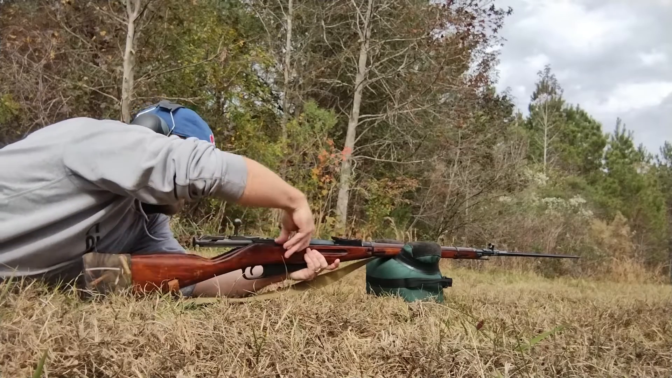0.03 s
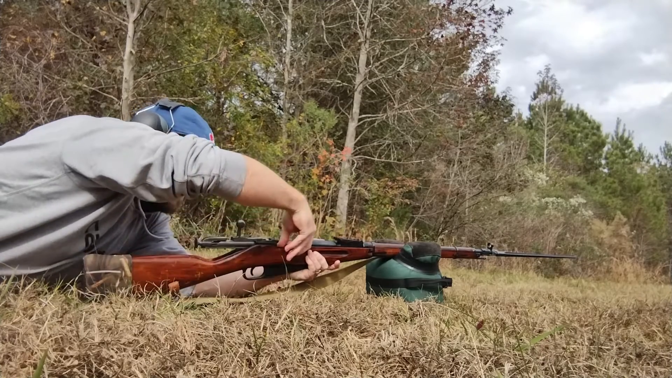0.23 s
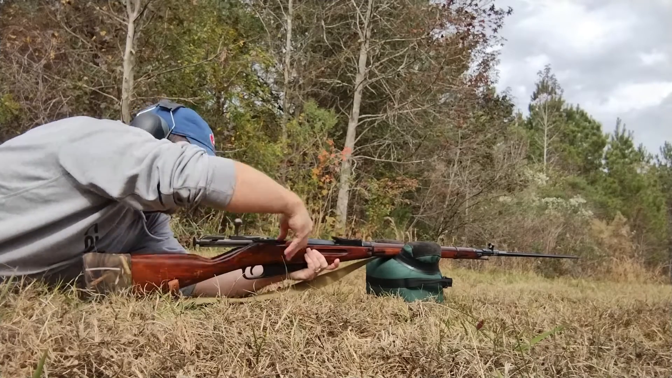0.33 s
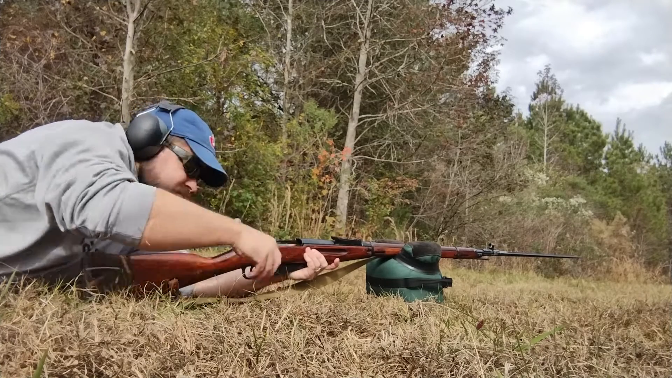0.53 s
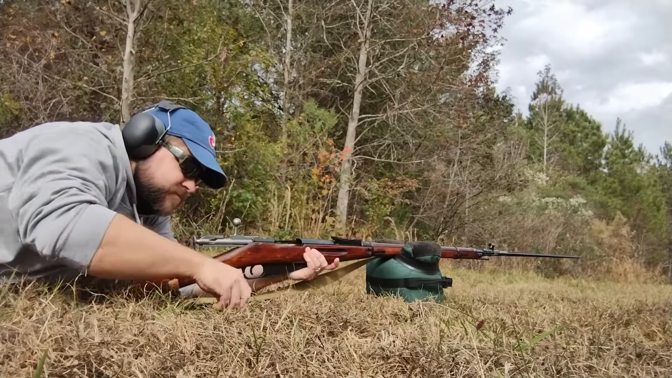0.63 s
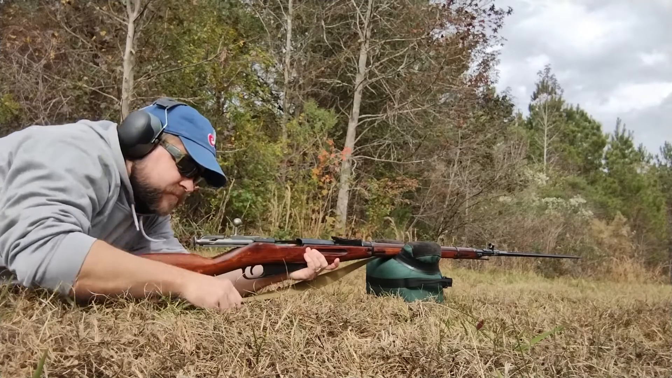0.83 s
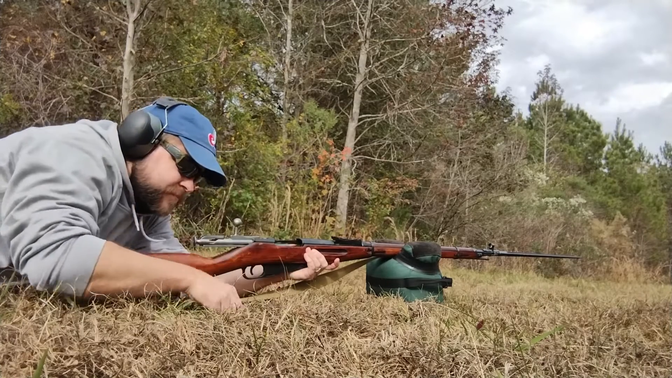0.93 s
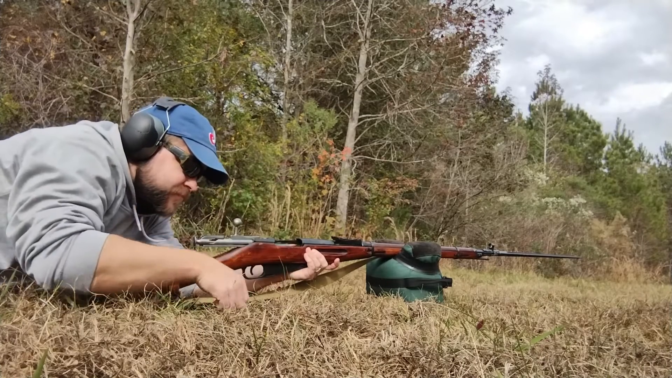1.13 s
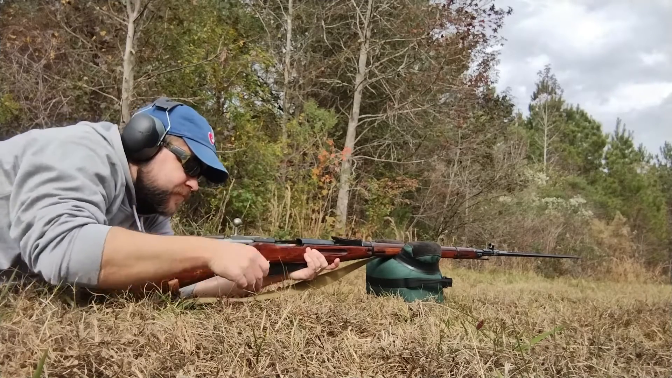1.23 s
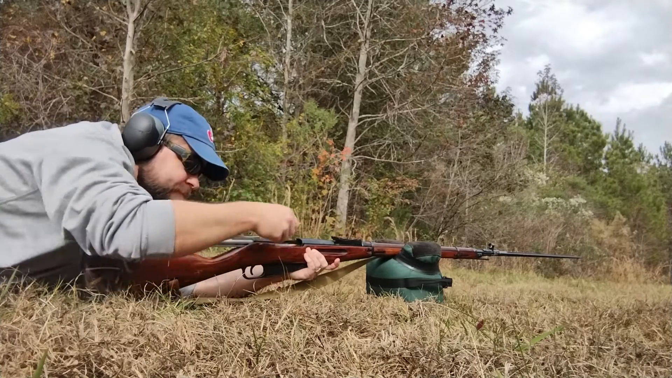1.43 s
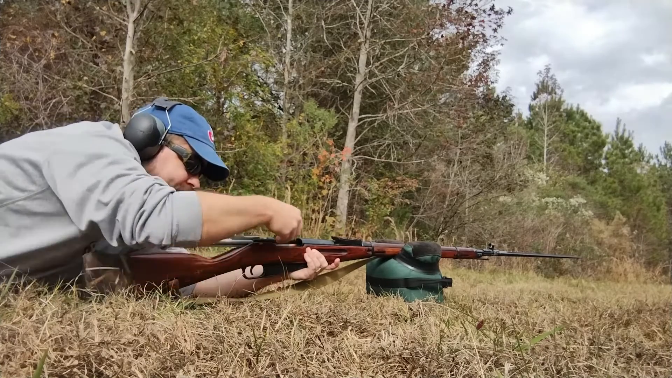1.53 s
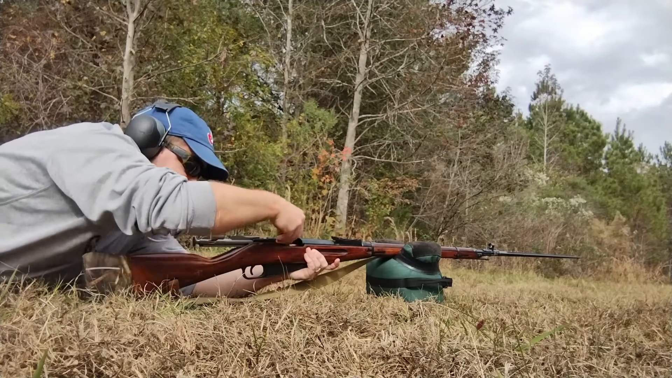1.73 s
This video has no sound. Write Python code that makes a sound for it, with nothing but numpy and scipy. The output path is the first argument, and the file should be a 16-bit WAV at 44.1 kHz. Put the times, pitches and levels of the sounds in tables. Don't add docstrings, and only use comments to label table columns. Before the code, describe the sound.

Close stereo sound of a steel rifle bolt in a wooden stock, rattling, clacking hard twice and settling within half a second; afterwards only low open-air rumble, soft hiss, faint engine drone and thin insect ticks.

```python
import sys
import numpy as np
from scipy import signal
from scipy.fft import rfft, irfft, next_fast_len
from scipy.io import wavfile
from scipy.ndimage import map_coordinates

SR = 44100
rng = np.random.default_rng(int(sys.argv[2]) if len(sys.argv) > 2 else 0)


def materialize(psi):
    bounded = np.clip(np.atleast_2d(psi).T, -1, 1)
    quanta = np.round(bounded * 32767).astype(np.int16)
    wavfile.write(sys.argv[1], SR, quanta)


def voltage_ratio(decibels):
    exponent = np.asarray(decibels, float) / 20
    return 10 ** exponent


N = 77175
HALVES = np.array([[.5], [-.5]])


def unit(x):
    return x / np.sqrt(np.mean(x ** 2) + 1e-20)


def along(points, hz):
    f, v = np.transpose(points)
    return np.interp(np.log(hz + 1), np.log(f + 1), v)


def wobble(rate):
    knots = rng.standard_normal(int(N * rate / SR) + 4)
    return map_coordinates(knots, [np.arange(N) * rate / SR])


def filtered(x, response):
    m = next_fast_len(N + SR // 2)
    return irfft(rfft(x, m) * response(np.fft.rfftfreq(m, 1 / SR)), m)[..., :N]


def resonances(table):
    def response(f):
        total = 0
        for k, (centre, width, db) in enumerate(table):
            mode = 1j * f * width / (centre ** 2 - f ** 2 + 1j * f * width)
            total = total + (-1) ** k * voltage_ratio(db) * mode
        return total
    return response


# (time [s], level [dB], edge brightness [dB], length [s], pitch [Hz])
SLIDE_CONTACTS = [
    (0.0404, -36.5, 3.5, .0024, 4550),
    (.0722, -33, 10, .0012, 3803),
    (0.0725, -32, -9.5, 0.002, 3751),
    (.0748, -29.5, -5, 0.0034, 3950),
    (0.0807, -40, -10.5, 0.0063, 3800),
    (.0842, -36, 0.5, .003, 4946),
    (.0882, -30.5, 5.5, .0012, 4700),
    (.0915, -32.5, -7, .0025, 4200),
    (.0955, -40.5, -3, .004, 3820),
    (.102, -54, -6.5, .007, 3521),
]
CLACK_CONTACTS = [(0.191, -46, -1.5, .004, 4600), (0.1994, -26.5, -5, .004, 4200),
                  (.2045, -14, 7, .0016, 4000), (.2060, -8, 0, .0026, 4000), (.2075, -9, -9, .002, 3300),
                  (.2092, -10, -5, .0022, 4500), (0.2123, -22.5, -3.5, 0.0046, 3900),
                  (.2194, -23.5, 7, .0025, 4000), (.2211, -11, -3, .0024, 4400),
                  (.2233, -15, -1, .0017, 3600), (0.2261, -23.5, -3, .0052, 3900),
                  (.2322, -24.5, 0, .005, 3800), (.2388, -36, -8, .01, 3800)]
SETTLE_CONTACTS = [
    (.3707, -52, -1.5, 0.0012, 3170),
    (.3781, -54.5, -18.5, .003, 3930),
    (.3909, -33, -4, .0022, 4200),
    (.3934, -41, -12, .003, 3600),
    (.3969, -37, -8, .002, 4400),
    (.3993, -32, -8, .0028, 4600),
    (.4030, -48, -14, .004, 3300),
    (.4112, -55.5, -6, 0.003784, 4900),
    (1.5496, -69.5, -1.5, 0.00208, 3500),
]
TOUCH_CONTACTS = [
    (1.7405, -72, -15, 0.0029192, 2400),
    (1.7445, -72.5, -15, 0.002214, 2400),
]
KNOCK_DB = [-4.5, -4, 2, 22]
KNOCK_T60 = [.08, 0.071, 0.05691, 0.057454]
GROUND_DB = [-20, -16.5, -25, -25.5]
# treble corner of the edge [Hz], light contacts carry less
DULL_CORNER_HZ = [10953, 20014, 10453, 7001.3]


def bolt():
    contacts = [SLIDE_CONTACTS, CLACK_CONTACTS, SETTLE_CONTACTS, TOUCH_CONTACTS]
    x = sum(movement(*each) for each in zip(contacts, KNOCK_DB, KNOCK_T60, GROUND_DB, DULL_CORNER_HZ))
    low_hz, gap_hz, gap_width_hz, gap_depth = 347.93, 1855.6, 710, .7
    dip = resonances([(gap_hz, gap_width_hz, 0)])
    return filtered(x, lambda hz: (1j * hz / (low_hz + 1j * hz)) ** 3 * (1 - gap_depth * dip(hz)))


# (frequency [Hz], left minus right [dB])
BOLT_LEVEL_SIDE = [(500, -1), (1500, -1), (3000, .6), (6000, 2), (10000, 5.5), (14000, 11)]
# (frequency [Hz], lead of the left [rad])
BOLT_PHASE_SIDE = [(100, -.4), (700, -.7), (1500, -.8), (3000, -1.05), (6000, -1.4), (14000, -1.55)]


def placed_bolt():
    def sides(hz):
        return voltage_ratio(HALVES * along(BOLT_LEVEL_SIDE, hz)) * np.exp(1j * HALVES * along(BOLT_PHASE_SIDE, hz))
    return filtered(bolt(), sides)


# (frequency [Hz], width [Hz], level [dB])
EDGE_MODES = [(7600, 1600, 3.5), (10680, 1000, -3), (12105, 1200, -1), (14330, 1200, -8)]
# (frequency [Hz], width [Hz], level [dB])
RECEIVER_MODES = [(2400, 500, -21.5), (2875.3, 800, -5.5), (3900, 900, 13.5), (4900, 900, -7),
                  (6400, 900, -8)]
# (frequency [Hz], width [Hz], level [dB])
STOCK_MODES = [(406.74, 90, -7), (549.15, 53, 3), (746, 110, 0), (972.22, 150, -2), (1370, 225.66, 2.5)]
# (frequency [Hz], width [Hz], level [dB])
SCATTER_MODES = [(4200, 5000, 4.5), (12320, 6500, -10.5)]
# (frequency [Hz], decay time to -60 dB [s])
TREE_T60 = [(500, .45), (3500, .8), (8000, .42), (15000, .22)]


def movement(contacts, knock_db, knock_t60, ground_db, dull_hz):
    t = np.arange(N) / SR
    grit = np.sign(rng.standard_normal((2, N)))
    edge, tone, body, blows = np.zeros((4, N))
    body_late_s, edge_share = .001, .75
    pair_db, pair_ratio = -5, 1.2
    phases = rng.uniform(0, 2 * np.pi, (len(contacts), 2))
    for (s, db, bright, length, hz), phase in zip(contacts, phases):
        late = voltage_ratio(db) * burst(s + body_late_s, length)
        first = np.sin(2 * np.pi * hz * t + phase[0])
        second = voltage_ratio(pair_db) * np.sin(2 * np.pi * pair_ratio * hz * t + phase[1])
        edge += voltage_ratio(db + bright) * burst(s, edge_share * length) * grit[0]
        tone += late * (first + second)
        body += late * grit[1]
        blows[int(s * SR)] += voltage_ratio(db) * np.sqrt(length * SR)
    click = filtered(edge, lambda f: 1.9 * resonances(EDGE_MODES)(f) / (1 + 1j * f / dull_hz) ** 2)
    rasp = filtered(body, lambda f: resonances(RECEIVER_MODES)(f) / (1 + 1j * f / 7000))
    knock = voltage_ratio(knock_db - 2) * filtered(blows, resonances(STOCK_MODES))
    wood = .66 * knock + .95 * echoes(knock, [(1000, knock_t60)])[0]
    rough = filtered(body + .52 * edge, resonances(SCATTER_MODES)) + wood
    ground = voltage_ratio(ground_db) * echoes(rough, [(1000, .14)])
    trees = voltage_ratio(-37.5) * echoes(rough, TREE_T60)
    return click + .8 * tone + voltage_ratio(-1.5) * rasp + wood + ground + trees


def burst(s, length):
    u = (np.arange(N) / SR - s) / max(length, 1e-4)
    rise = np.clip(u / .35, 0, 1)
    return rise * np.exp(-np.clip(u, 0, 6) ** 3) * (u < 6)


def echoes(x, decays):
    hz, t, z = signal.stft(rng.standard_normal((2, SR // 2)), SR, nperseg=256)
    decay = voltage_ratio(-60 * t / along(decays, hz)[:, None])
    tail = signal.istft(z * decay, SR, nperseg=256)[1]
    return signal.fftconvolve(x[None], tail / np.linalg.norm(tail[0]), axes=1)[:, :N]


# (multiple of the firing rate [1], level [dB])
ENGINE_ORDERS = [(2, -71), (3, -65), (4.5, -82.5)]
# (time [s], level of the 4th [dB], level of the 6th [dB])
ENGINE_DRIFT = [(0, -74, -71), (.5, -72, -68), (1.0, -76.5, -68), (1.4, -68, -74), (1.75, -67.5, -74.5)]


def engine():
    engine_hz, firing_s, side_db, lead_s = 45.589, .853, -.5159, .0001
    t = np.arange(N) / SR
    s, fourth, sixth = np.transpose(ENGINE_DRIFT)
    levels = ENGINE_ORDERS + [(4, np.interp(t, s, fourth)), (6, np.interp(t, s, sixth))]
    turn = 2 * np.pi * engine_hz * (t - firing_s + lead_s * HALVES)
    tone = 0
    for k, db in levels:
        tone = tone + voltage_ratio(db + 1.2 * wobble(9.015)) * np.cos(k * turn + .25 * wobble(7))
    return np.sqrt(2) * tone * voltage_ratio(side_db * HALVES)


# (frequency [Hz], width [Hz], level [dB])
INSECT_MODES = [(14200, 1500, 3), (14410, 800, -8.5), (15600, 170, 3.5)]
# (delay [s], level [dB])
WEAKER_TICKS = [(-.0065, -9.5), (.006, -8), (.017, -11.5), (.024, -16)]


def insect():
    start_s, period_s, tick_s = .0113, .03418, .0021
    tick_db, side_db, chorus_db = -65, 8.5, -85
    count = int(N / SR / period_s)
    chance = rng.standard_normal((count, len(WEAKER_TICKS) + 1, 2))
    late, db = np.transpose([(.002004, 0)] + WEAKER_TICKS)
    s = start_s + period_s * np.arange(count)[:, None] + late
    s = s + chance[..., 0] * (.0005 + .08 * abs(late))
    places = np.clip((s * SR).astype(int), 0, N - 1).ravel()
    marks = np.bincount(places, voltage_ratio(db + 1.2 * chance[..., 1]).ravel(), N)
    swell = signal.fftconvolve(marks, np.hanning(int(tick_s * SR)))[:N]
    pair = rng.standard_normal((2, N))
    partly_alike = np.array([pair[0], .7 * pair[0] + .7 * pair[1]])
    both = partly_alike * (voltage_ratio(tick_db) * swell + voltage_ratio(chorus_db))
    return 2 * filtered(both, resonances(INSECT_MODES)) * voltage_ratio(side_db * HALVES)


# (frequency [Hz], density [dB per Hz])
AIR_SPECTRUM = [(20, -26.5), (50, -23.5), (75, -8), (200, -12.5), (320, -18), (520, -27), (1500, -34.5),
                (9500, -38.5)]
# (frequency [Hz], left-right likeness [1])
AIR_LIKENESS = [(40, .3), (150, 0.41), (600, 0.45), (3000, 0.23), (14000, 0.26)]


def air():
    def shares(hz):
        turn = np.arccos(np.clip(along(AIR_LIKENESS, hz), -1, 1)) / 2
        return voltage_ratio(along(AIR_SPECTRUM, hz)) * np.array([np.cos(turn), np.sin(turn)])
    mid, side = filtered(rng.standard_normal((2, N)), shares)
    fade_db = -1.6468 * (np.arange(N) - N / 2) / SR
    return voltage_ratio(-68 + fade_db + .55 * wobble(2)) * unit(np.array([mid + side, mid - side]))


def scene():
    return placed_bolt() + engine() + insect() + air()


def band_limit(x):
    return signal.sosfilt(signal.butter(12, 16310, fs=SR, output="sos"), x)


def record(dry):
    mix = filtered(dry, lambda hz: 1 / (1 + (hz / 15830) ** 120))
    return band_limit(mix)


dry = scene()
out = record(dry)
materialize(out)
```